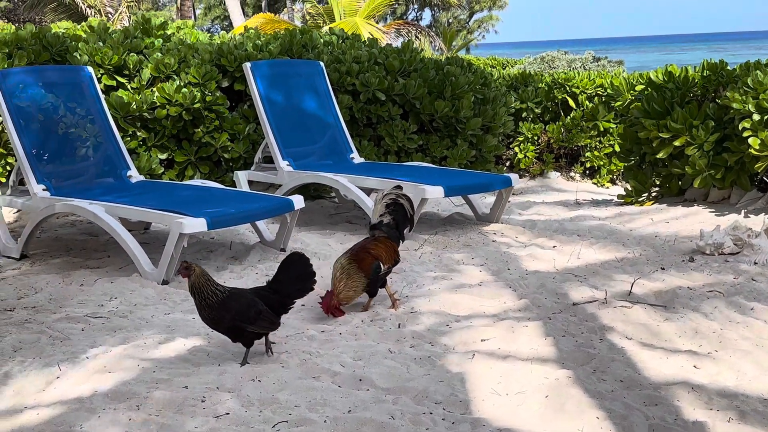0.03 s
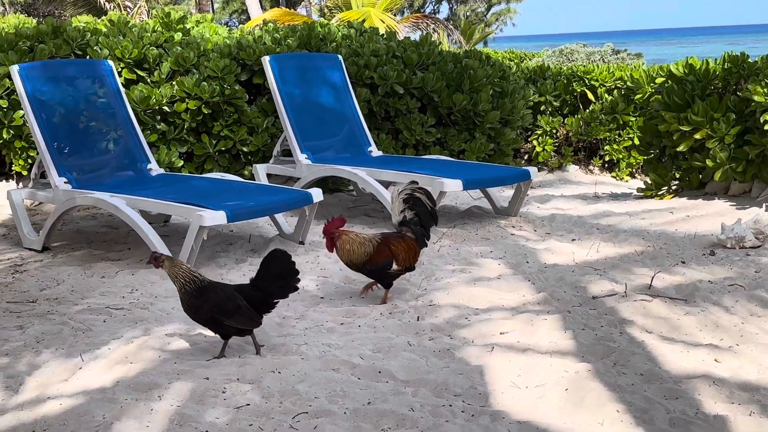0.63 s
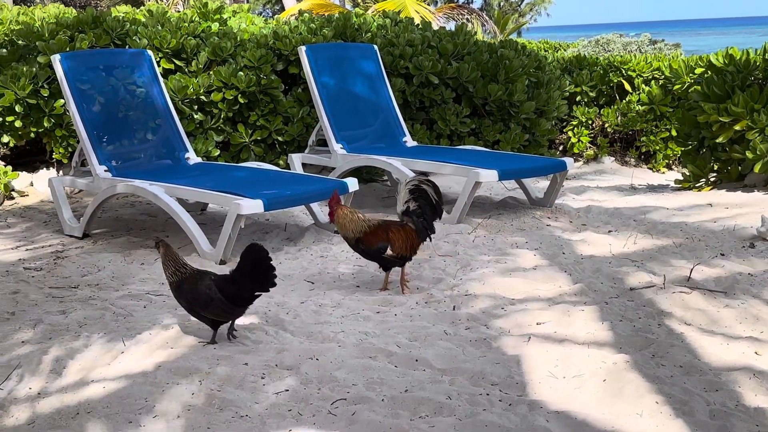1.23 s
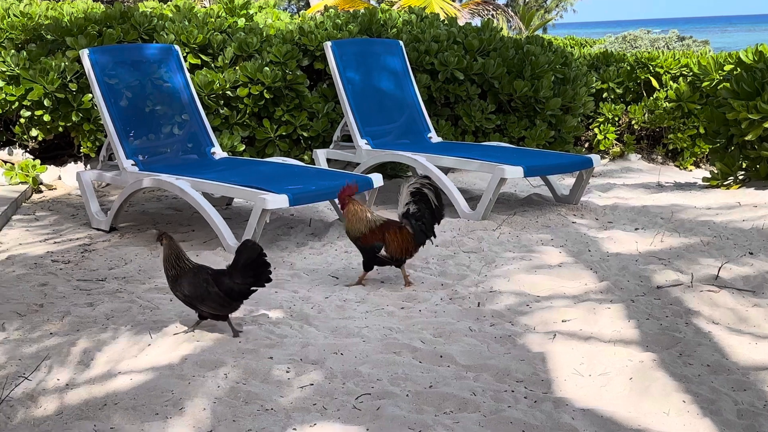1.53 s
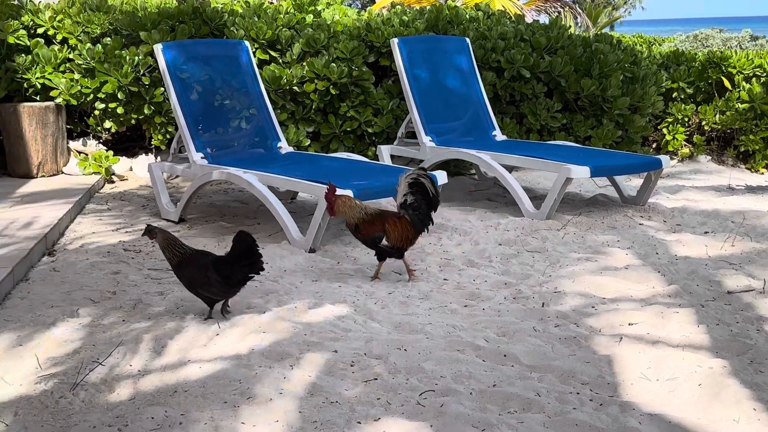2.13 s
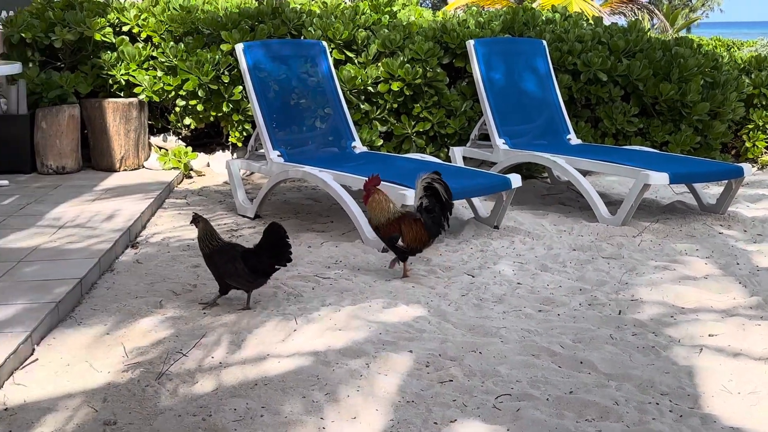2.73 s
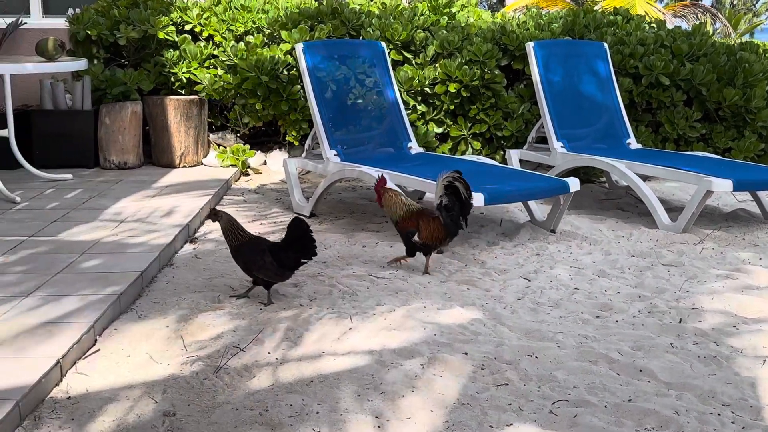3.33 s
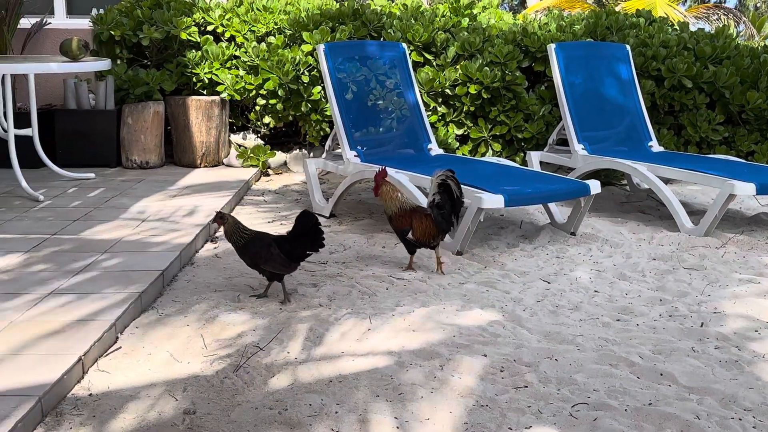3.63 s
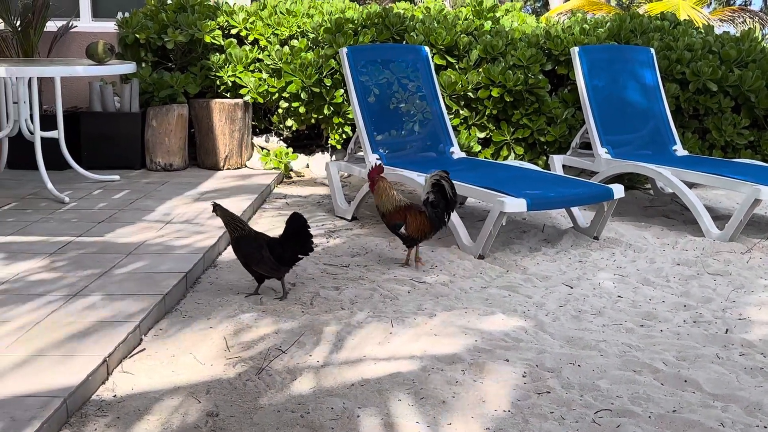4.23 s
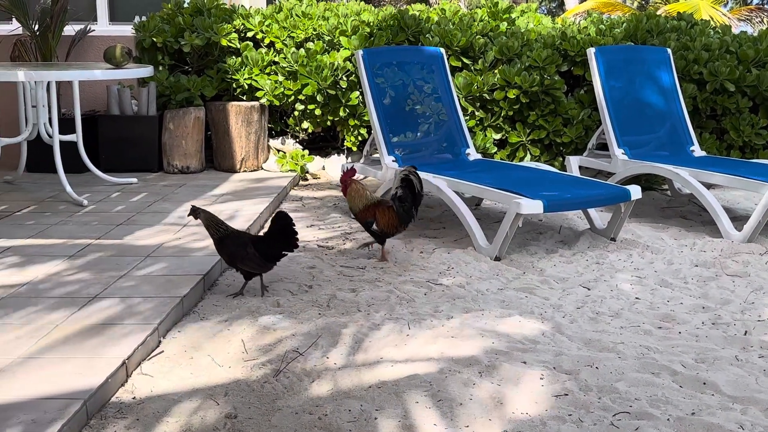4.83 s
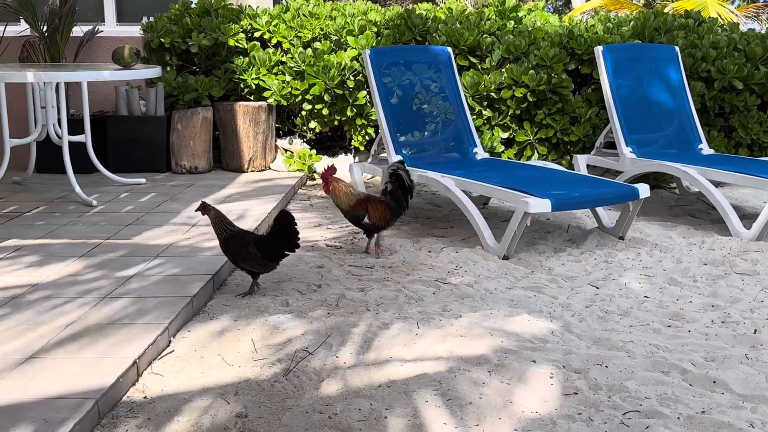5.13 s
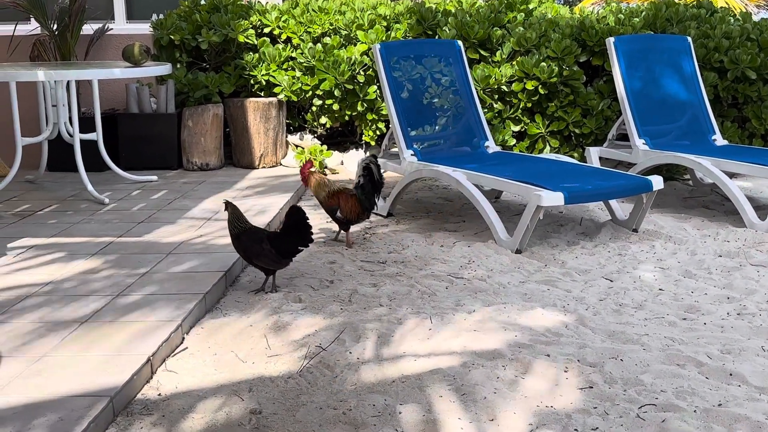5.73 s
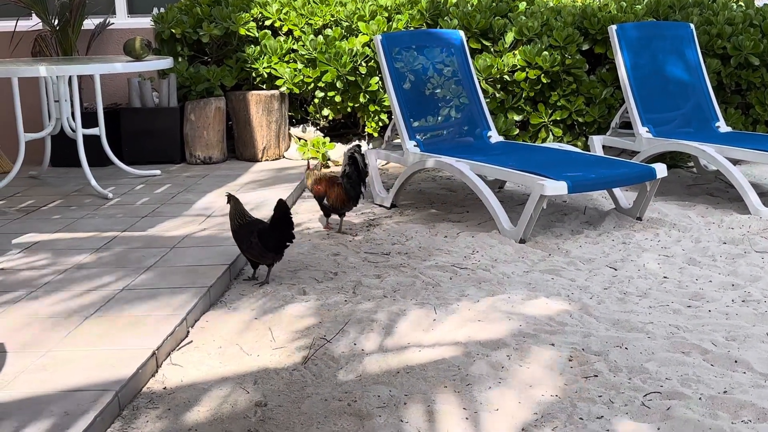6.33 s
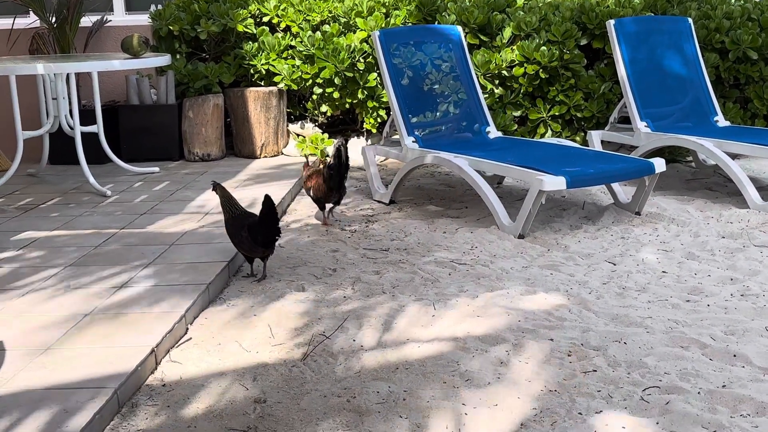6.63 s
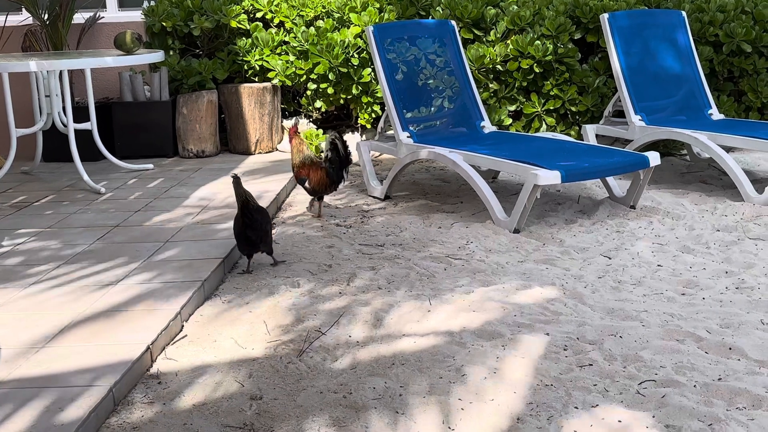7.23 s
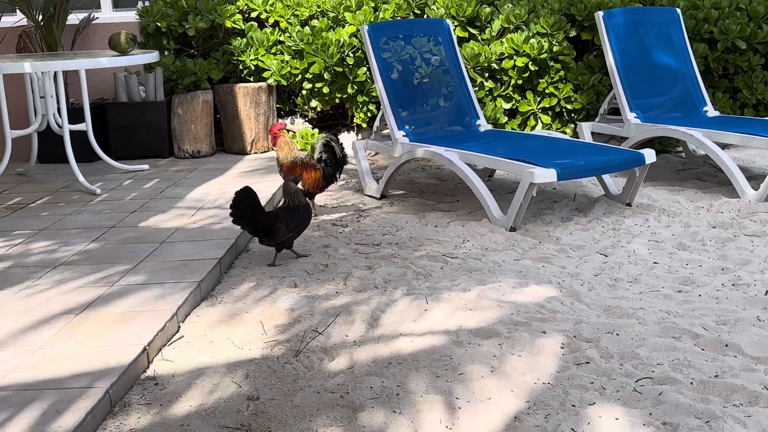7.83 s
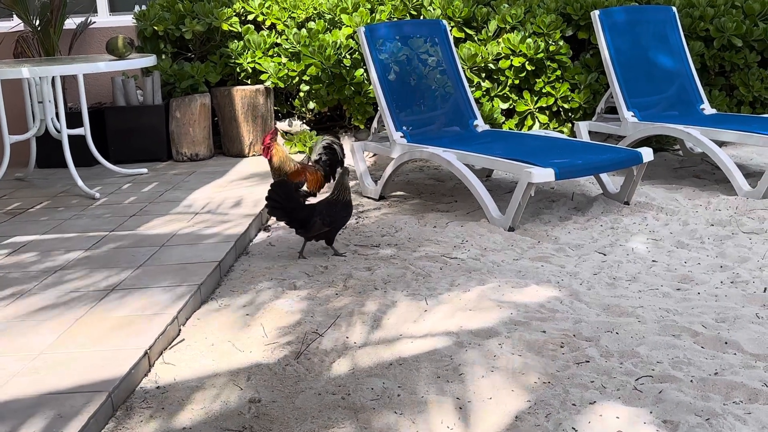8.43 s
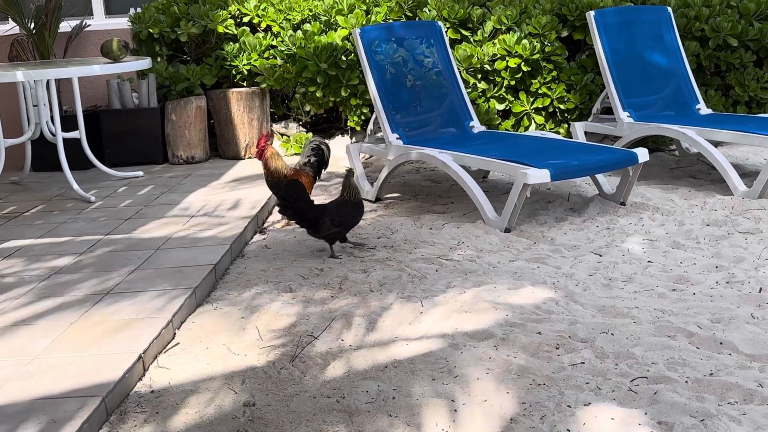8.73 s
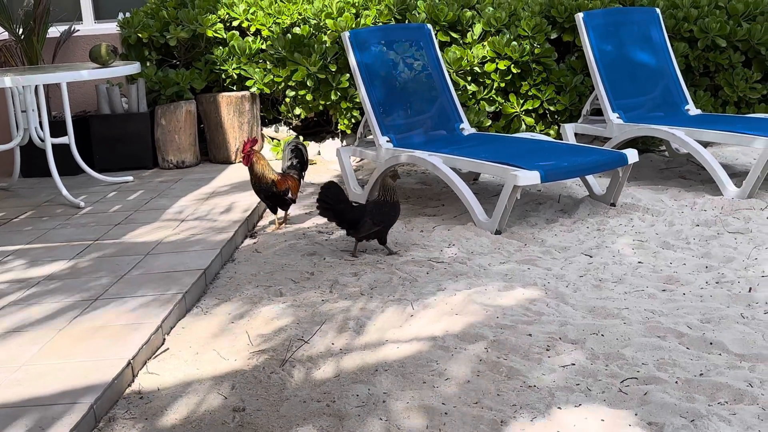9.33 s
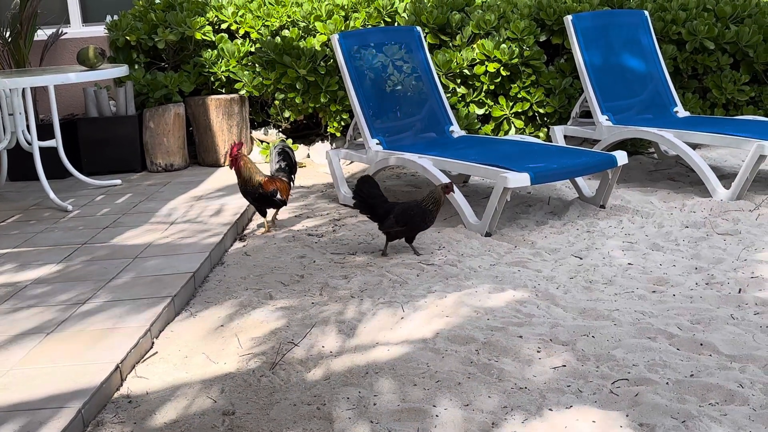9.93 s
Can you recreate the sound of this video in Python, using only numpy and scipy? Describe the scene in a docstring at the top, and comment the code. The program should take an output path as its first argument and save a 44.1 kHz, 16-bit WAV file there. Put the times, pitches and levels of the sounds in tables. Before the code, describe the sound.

Chickens cluck softly over distant surf and rustling leaves, while wind bumps the microphone and an unseen vehicle passes.

```python
"""A quiet beach garden behind a hedge. Far surf, leaves in the breeze, a low rumble, an idling engine
and a machine's hum sound from the start. Chickens cluck softly, among dull taps and scuffs of sand.
Near 4 s a gust buffets the microphone with its eddies; two hollow knocks and a second gust follow.
A vehicle swishes past out of sight, its tread note falling by the Doppler effect at 7 s. Then another
distant engine comes in and revs, and a last weak gust brushes the microphone."""
import sys
import numpy as np
from scipy import signal
from scipy.fft import rfft, irfft
from scipy.io import wavfile
from scipy.ndimage import uniform_filter1d

SR = 44100
rng = np.random.default_rng(int(sys.argv[2]) if len(sys.argv) > 2 else 0)


def file_out(sig):
    """Save sig as 16-bit WAV at sys.argv[1]."""
    # one column per channel
    cols = np.atleast_2d(sig).T
    # limit, then scale
    lim = np.clip(cols, -1, 1)
    pcm = np.round(lim * 32767).astype(np.int16)
    wavfile.write(sys.argv[1], SR, pcm)


N = 440559
TIME = np.arange(N) / SR


def gain_of(db):
    """The decibel law: amplitude grows tenfold every 20 dB."""
    return 10 ** (np.asarray(db) / 20)


def unit_rms(x):
    """Normalisation to unit mean power."""
    return x / np.sqrt(np.mean(x ** 2) + 1e-20)


def at_frequency(rows, hz):
    """Interpolation of a spectrum table on a log-frequency axis."""
    row_hz, value = np.transpose(rows)
    return np.interp(np.log(hz + 1), np.log(row_hz + 1), value)


def at_time(rows, t):
    """Linear interpolation of a table's last column over the times in its first."""
    columns = np.transpose(rows)
    return np.interp(t, columns[0], columns[-1])


def add(mix, start_s, sound):
    """Superposition: a sound joins the mix at start_s."""
    part = mix[..., max(round(start_s * SR), 0):][..., :sound.shape[-1]]
    part += sound[..., :part.shape[-1]]


def drift(hz):
    """Random modulation: noise of rms 1, low-passed at about hz."""
    bin_hz = np.fft.rfftfreq(N, 1 / SR)
    return unit_rms(irfft(rfft(rng.standard_normal(N)) * np.exp(-(bin_hz / hz) ** 2), N))


def bell(t, crest_s, sigma_s):
    """A Gaussian envelope of height 1."""
    return np.exp(-.5 * ((t - crest_s) / sigma_s) ** 2)


def swells(rows, t):
    """Incoherent addition: the amplitude of Gaussian swells whose powers sum."""
    return np.sqrt(sum((gain_of(db) * bell(t, s, sigma_s)) ** 2 for s, db, sigma_s, *_ in rows))


def stft_grid(size):
    """Frame times (as a column) and bin frequencies of a short-time spectrum."""
    hop = size // 4
    return (np.arange(N // hop + 3) * hop / SR)[:, None], np.fft.rfftfreq(size, 1 / SR)


# Likeness of outdoor sound at the microphone's two ports: frequency_hz, coherence
PORT_COHERENCE = [(60, .985), (130, .955), (290, .78), (420, .68), (600, .55), (750, .72), (950, .78),
                  (1150, .66), (1450, .58), (1750, .76), (2050, .94), (3000, .97), (5000, 1)]
# Level of the left port over the right: frequency_hz, level_db
PORT_BALANCE = [(150, 0), (400, 1.7), (850, 1.7), (1200, -2.3), (1600, -1), (2300, 0)]
# Phase lead of the left port: frequency_hz, phase_rad
PORT_LEAD = [(50, .12), (170, .42), (330, .42), (550, 1.1), (830, 1.6), (1000, 1.42), (1350, .75),
             (1700, 0), (2300, 0), (3000, .2), (4000, 0)]
def diffuse_noise(colour_db, patchy_db, size):
    """A diffuse field is only partly coherent at two ports: noise of rms 1 with drifting patches."""
    t, hz = stft_grid(size)
    a, b, c, d, patches = rng.standard_normal((5, len(t), len(hz)))
    patches = unit_rms(uniform_filter1d(uniform_filter1d(patches, size=9, axis=0), size=12, axis=1))
    coherence = at_frequency(PORT_COHERENCE, hz)
    left = a + 1j * b
    right = coherence * left + np.sqrt(1 - coherence ** 2) * (c + 1j * d)
    lean = gain_of(at_frequency(PORT_BALANCE, hz) / 2)
    lag = np.exp(-1j * at_frequency(PORT_LEAD, hz))
    spectra = np.array([left * lean, right * lag / lean]) * gain_of(colour_db + patchy_db * patches)
    _, noise = signal.istft(spectra, nperseg=size, noverlap=size - size // 4, time_axis=1, freq_axis=2)
    return unit_rms(noise[:, :N])


# Spectrum of far surf: frequency_hz, density_db
SURF_SPECTRUM = [(120, -28), (220, -3), (300, -7), (380, -6), (450, -5), (650, -6), (920, -7), (1340, -11),
                 (1650, -19), (4000, -34.5), (5200, -68)]
# Waves washing in: crest_s, level_db, sigma_s
WAVES = [(.6, -56, 0.53), (2.15, -59.5, 0.73), (3.55, -61.5, 0.77), (6.0, -51.5, 0.45), (7.6, -61, 1),
         (9.37, -56, 0.35)]
def surf():
    """Incoherent sources add in power: single waves rise over the steady wash."""
    _, hz = stft_grid(size=1024)
    level = np.hypot(gain_of(-60.5), swells(WAVES, TIME))
    flutter = gain_of(.5 * drift(hz=12))
    return level * flutter * diffuse_noise(at_frequency(SURF_SPECTRUM, hz), patchy_db=1.72, size=1024)


# Spectrum of the hedge's hiss: frequency_hz, density_db
LEAF_SPECTRUM = [(1200, -23), (2000, 5), (4000, 3), (5000, 3), (7800, 4), (9500, -1), (11000, 1.5),
                 (12500, -2.5), (15700, -3)]
# Puffs of breeze: crest_s, level_db, sigma_s
PUFFS = [(.1, -71.5, 0.44), (1.15, -66.5, 0.18), (4.25, -69, 0.25), (5.5, -70, 1), (8.1, -70, 0.2)]
def leaves():
    """Flow noise swells with the breeze; leaves touching at random add ticks of shot noise."""
    _, hz = stft_grid(size=512)
    touches_per_s, tick_decay_s = 90, .002
    level = np.hypot(gain_of(-67), swells(PUFFS, TIME))
    hiss = diffuse_noise(at_frequency(LEAF_SPECTRUM, hz), patchy_db=1.5, size=512)
    touches = (rng.random(N) < touches_per_s / SR) * gain_of(3.5 * np.minimum(rng.exponential(1, N), 4))
    ticks = signal.lfilter([1], [1, -np.exp(-1 / (tick_decay_s * SR))], touches) * rng.standard_normal(N)
    ticks = unit_rms(signal.sosfilt(signal.butter(1, 4000, "high", fs=SR, output="sos"), ticks))
    rustle = hiss + gain_of(-16) * ticks
    return level * gain_of(.41 * drift(hz=16)) * rustle


# Spectrum of wind and far traffic: frequency_hz, density_db
RUMBLE_SPECTRUM = [(18, -50), (30, -34), (42, -2.5), (58, 0.5), (80, -2), (120, -7), (170, -13.5),
                   (240, -19), (400, -28), (800, -59.5)]
# Level of the rumble, dipping after the two main gusts; idle and hum follow it: time_s, level_db
RUMBLE_LEVEL = [(0, -49.5), (.8, -52.5), (1.7, -49.5), (2.8, -52), (3.35, -51), (4.05, -50), (4.25, -59.5),
                (4.6, -65), (5.25, -51), (5.65, -44.5), (6.2, -47.5), (6.65, -56), (7.05, -59),
                (7.4, -51.5), (8.2, -50.5), (9.1, -52.5), (9.99, -45)]
def rumble():
    """Low-frequency noise of wind and far traffic, to which each gust adds its power."""
    _, hz = stft_grid(size=4096)
    level = np.hypot(gain_of(at_time(RUMBLE_LEVEL, TIME)), gain_of(-5) * gust_strength(TIME))
    return level * diffuse_noise(at_frequency(RUMBLE_SPECTRUM, hz), patchy_db=-.04, size=4096)


def drone(hz, level_db, orders, waver_db):
    """A distant machine's harmonic series: only the lowest orders carry, each wavering on the wind."""
    turns = np.cumsum(hz * (1 + .0059 * drift(hz=5.06))) / SR  # the speed wanders slightly
    port_turns = np.array([[.0165], [-.0165]])
    harmonics = np.zeros((2, N))
    for order, db in orders:
        amplitude = gain_of(db + waver_db * drift(hz=4.2))
        harmonics += amplitude * np.sin(2 * np.pi * (order * turns + rng.random() + port_turns))
    return gain_of(level_db) * unit_rms(harmonics)


# Frequency response of the exhaust: frequency_hz, gain_db
EXHAUST = [(38, -4.5), (46, 2), (78, -7), (92, 0), (122, -2), (140, -10), (175, -19.5), (232, -17.5),
           (280, -39)]
def idling_engine():
    """Source and filter: as the idle sags, slows and fades, its orders cross the exhaust's resonances."""
    idle_hz, droop_hz_per_s, settled_s = 47.4, .8, 2.3
    sag_hz = 7.2 * bell(TIME, crest_s=.6, sigma_s=.24)
    hz = idle_hz - sag_hz - droop_hz_per_s * np.minimum(TIME, settled_s)
    away_db = np.clip(3 * (TIME - 1.9), 0, 11)  # moves off from 1.9 s, losing 3 dB a second
    orders = [(order, at_frequency(EXHAUST, order * hz)) for order in range(1, 7)]
    return drone(hz, at_time(RUMBLE_LEVEL, TIME) + 5.5 - away_db, orders, waver_db=2.3)


# Harmonics of the hum: order, level_db
HUM_ORDERS = [(1, 3), (2, -10.5), (5, -22)]
def machine_hum():
    """Periodic vibration at a nearly constant rate gives a low harmonic hum."""
    return drone(hz=60.46, level_db=at_time(RUMBLE_LEVEL, TIME) - 1, orders=HUM_ORDERS, waver_db=6.5)


# Spectrum of tyre roar when centred on 900 Hz: frequency_hz, density_db
ROAR_SPECTRUM = [(250, -27), (330, -26), (460, -5.5), (560, -15), (740, -0.5), (900, 0.5), (1100, -6.5),
                 (1350, -9), (1600, -13.5), (2600, -23.5), (4500, -36), (7000, -57)]
# Swells of tyre roar: crest_s, level_db, sigma_s, centre_hz
PASSES = [(0.44, -62.5, 0.61, 980), (4.166, -62.5, 0.75, 1100), (5.65, -54, 0.37, 864),
          (7.13, -53.5, 1.17, 920), (9.25, -62.5, 0.23, 1210)]
def tyre_roar():
    """Broadband rolling noise, centred on the power-weighted mean frequency of its swells."""
    t, hz = stft_grid(size=2048)
    powers = [swells([row], t) ** 2 + 1e-30 for row in PASSES]
    centre_hz = sum(power * row[-1] for power, row in zip(powers, PASSES)) / sum(powers)
    colour_db = at_frequency(ROAR_SPECTRUM, hz * 900 / centre_hz)
    return swells(PASSES, TIME) * diffuse_noise(colour_db, patchy_db=1.5, size=2048)


# Soft clucks: start_s, peak_db, pitch_hz, length_s
CLUCKS = [(0.232, -39, 211.5, 0.034), (0.377, -38.5, 228.5, 0.028), (0.58, -49, 186, 0.016),
          (0.738, -34.5, 221.5, 0.037), (2.395, -48, 238, 0.023)]
# Formants of a chicken's throat: frequency_hz, bandwidth_hz, level_db
THROAT = [(374, 350, 12), (684, 110, -7), (1130, 160, 1.5), (1310, 120, 0), (1600, 270, -19),
          (3300, 1400, -25)]
def clucks():
    """Source and filter: a handful of voice pulses ring the formants of a chicken's throat."""
    out = np.zeros(N)
    t = np.arange(SR // 50) / SR
    ring = sum(gain_of(db) * width * np.exp(-np.pi * width * t) * np.sin(2 * np.pi * hz * t)
               for hz, width, db in THROAT)
    for start_s, db, hz, length_s in CLUCKS:
        count = round(length_s * SR)
        pulses = np.diff(np.floor(np.arange(count + 1) * hz / SR))  # one per pitch period
        call = np.convolve(pulses * signal.windows.tukey(count, .8), ring)
        add(out, start_s, gain_of(db) * call / abs(call).max())
    return out


# Dull taps: start_s, peak_db, band_hz, t60_s
TAPS = [(0.382, -47, 248, 0.057), (0.580, -42, 367, 0.09), (1.945, -45, 480, .1), (2.287, -47, 320, .1),
        (2.802, -52, 409, 0.05), (3.109, -42.5, 380, 0.09), (3.238, -48, 300, 0.059),
        (3.544, -44, 670, 0.048), (5.071, -48.5, 380, 0.035)]
def taps():
    """Heavily damped transients: puffs of low band noise that decay exponentially."""
    out = np.zeros((2, N))
    t = np.arange(SR // 4) / SR
    for start_s, db, hz, t60 in TAPS:
        onset = 1 - np.exp(-t / (.019 * t60))  # longer taps start more softly
        shared, apart = rng.standard_normal((2, len(t))) * onset * gain_of(-60 * t / t60)
        band = signal.butter(3, [hz / 1.7, hz * 1.4], "band", fs=SR, output="sos")
        tap = signal.sosfilt(band, [shared + .67 * apart, shared - .56 * apart])
        add(out, start_s, gain_of(db) * tap / abs(tap).max())
    return out


# Feet scuffing sand, in a narrow band just under top_hz: start_s, level_db, top_hz, length_s
SCUFFS = [(1.084, -78, 4800, .2), (1.215, -65, 4300, .05), (9.138, -71.5, 3100, 0.23)]
def scuffs():
    """Granular friction: sand slips under a foot in a brief, gritty swish."""
    out = np.zeros(N)
    for start_s, db, hz, length_s in SCUFFS:
        grains = rng.standard_normal(round(length_s * SR)) ** 3  # cubing makes the noise spiky
        band = signal.butter(2, [hz / 1.09, hz * .96], "band", fs=SR, output="sos")
        grit = unit_rms(signal.sosfilt(band, grains))
        add(out, start_s, gain_of(db) * grit * signal.windows.hann(len(grit)))
    return out


# Distinct eddies at the microphone: crest_s, peak_db, pitch_hz (at the crest)
EDDIES = [(1.564, -37.5, 385), (2.144, -43, 332), (3.700, -22, 185), (3.736, -22, 173), (3.747, -15, 126),
          (3.767, -21, 72), (3.819, -35, 224), (3.830, -21, 129), (3.846, -22.5, 123), (3.899, -19, 70),
          (3.917, -22.5, 175), (3.928, -23, 94.5), (3.951, -34.5, 233), (3.965, -25.5, 85),
          (3.984, -25, 212), (4.012, -14, 97), (4.034, -20.5, 52), (4.046, -28.5, 178),
          (4.066, -23.5, 70.5), (4.080, -25.5, 113), (4.105, -27, 96), (5.545, -37, 70), (5.985, -25, 102),
          (6.017, -25, 155), (6.034, -26, 125), (6.139, -21.5, 242), (6.154, -24.5, 238),
          (6.164, -26.5, 143), (6.182, -30, 90), (9.501, -39.5, 270), (9.515, -39, 268), (9.82, -33, 72.2),
          (9.892, -35.5, 84)]
def buffets():
    """Turbulent pressure: each eddy shoves the diaphragm in a few uneven swings that sink to a thump."""
    rise_cycles, fall_per_rise, sharpness, thump_hz = 1.47, .55, 4.55, 48
    out = np.zeros((2, N))
    t = np.arange(SR // 8) / SR
    turbulence = drift(hz=136)
    eddies = EDDIES + small_eddies()
    for (crest_s, db, hz), (phase, side) in zip(eddies, rng.random((len(eddies), 2))):
        rise_s = rise_cycles / hz
        age = t / rise_s  # 1 at the crest
        stray = np.exp(.12 * np.roll(turbulence, -round(crest_s * SR))[:len(t)])
        sinking_hz = np.maximum(hz * np.exp(fall_per_rise * (1 - age)), thump_hz)
        turns = np.cumsum(stray * sinking_hz) / SR
        swell = gain_of(db) * (age * np.exp(1 - age)) ** sharpness
        port_turns = np.array([[.035], [-.035]]) * np.sign(side - .5)  # one port is met first
        add(out, crest_s - rise_s, swell * np.sin(2 * np.pi * (turns + phase + port_turns)))
    return out


# Gusts, each a stream of small eddies: start_s, length_s, eddy_peak_db, typical_pitch_hz
GUSTS = [(3.714, 0.39, -33.5, 125), (5.971, 0.21, -35, 165), (6.251, 0.084, -38.5, 178),
         (6.485, 0.0427, -41, 131), (9.43, 0.35, -49, 131)]
def gust_strength(t, edge_s=.03):
    """A trapezoidal envelope: each gust rises quickly, holds and drops."""
    return sum(gain_of(db) * np.clip(np.minimum(t - start_s, start_s + length_s - t) / edge_s + 1, 0, 1)
               for start_s, length_s, db, _ in GUSTS)


def small_eddies(spacing_s=.024):
    """Turbulence breaks a gust into eddies of random size and timing: crest_s, peak_db, pitch_hz."""
    slots = np.arange(0, N / SR, spacing_s)
    late, spread = rng.random((len(slots), 2)).T
    times = slots + spacing_s * late
    pitches = at_time(GUSTS, times) * 2 ** (spread - .5)  # scattered over one octave
    pushes = gust_strength(times)
    return [(s, 20 * np.log10(push), hz) for s, push, hz in zip(times, pushes, pitches) if push > 0]


# Hollow knocks some way off: start_s, peak_db
KNOCKS = [(5.513, -33), (5.680, -37)]
# Modes of the hollow body: frequency_hz, level_db, t60_s
HOLLOW_MODES = [(447, -7, 0.047), (600, -7, 0.025), (710, -3, 0.035), (770, 0, 0.027), (980, -10, 0.018)]
def knocks():
    """Modal ringing: a blunt, scraping blow excites short modes, each with its own phase at each port."""
    out = np.zeros((2, N))
    t = np.arange(SR // 4) / SR
    for start_s, db in KNOCKS:
        modes = sum(gain_of(mode_db - 60 * t / t60) * np.sin(2 * np.pi * (hz * t + rng.random((2, 1))))
                    for hz, mode_db, t60 in HOLLOW_MODES)
        scrape = rng.standard_normal(len(t)) * np.exp(-t / .035)
        blow = signal.sosfilt(signal.butter(2, 1600, fs=SR, output="sos"), scrape)
        knock = signal.fftconvolve(modes, blow[None], axes=1)[:, :len(t)]
        add(out, start_s, gain_of(db) * knock / abs(knock).max())
    return out


# Bursts in which the tread sings: crest_s, level_db, sigma_s
TREAD_BURSTS = [(5.85, -55.5, 0.13), (6.33, -51.5, 0.071), (6.87, -50.5, 0.22), (7.3, -57, 0.27),
                (8.4, -61, 0.32)]
def tread_song():
    """Doppler effect: the tread's noisy note and its lower octave fall as the vehicle goes by."""
    tread_hz, half_width_hz = 914, 55
    doppler_share, nearest_s, passing_s = .042, 7, .17
    t, hz = stft_grid(size=2048)
    heard_hz = tread_hz * (1 - doppler_share * np.tanh((t - nearest_s) / passing_s))
    upper, lower = (1 / (1 + ((hz - note) / half_width_hz) ** 2) for note in (heard_hz, heard_hz / 2))
    colour_db = 20 * np.log10(upper + gain_of(-10.5) * lower)
    return swells(TREAD_BURSTS, TIME) * diffuse_noise(colour_db, patchy_db=1.0, size=2048)


# Harmonics of the second engine's firing rate: order, level_db
REVVING_ORDERS = [(1, 6), (2, -13), (3, -16.5), (4, -25)]
def revving_engine():
    """Pitch follows firing rate: the throttle raises pitch and level together, then the engine slows."""
    running_s, base_hz, base_db = 7.25, 57.7, -49.5
    rev_s, rev_hz, rev_db, slowing_hz_per_s = 8.79, 18.4, 6, 5
    throttle = .5 + .5 * np.tanh((TIME - rev_s) / .122)
    hz = base_hz + rev_hz * throttle - slowing_hz_per_s * np.maximum(TIME - rev_s, 0)
    fade_in = np.clip((TIME - running_s) * 10 + 1, 0, 1)
    return fade_in * drone(hz, base_db + rev_db * throttle, REVVING_ORDERS, waver_db=1.5)


def scene():
    """Linear superposition: the pressures of all the sources add at the two ports."""
    background = surf() + leaves() + rumble() + idling_engine() + machine_hum() + tyre_roar()
    return background + clucks() + taps() + scuffs() + buffets() + knocks() + tread_song() + revving_engine()


# Phase lag of the right channel, opposing the left near 8 kHz: frequency_hz, phase_rad
TREBLE_LAG = [(6750, 0), (7000, .8), (7450, 1.5), (7800, 3.1), (8720, 3.2), (9000, 4.7), (9600, 5.3),
              (10300, 5.5), (10450, 6.28), (13000, 6.28), (14000, 7.3), (15700, 8.5)]
def record(dry):
    """Linear filtering: the microphone pair twists the treble's phase and limits the band at both ends."""
    hz = np.fft.rfftfreq(N, 1 / SR)
    lag_rad = np.interp(hz, *np.transpose(TREBLE_LAG))
    right = irfft(rfft(dry[1]) * np.exp(-1j * lag_rad), N)
    pair = signal.sosfilt(signal.butter(3, 34, "high", fs=SR, output="sos"), [dry[0], right])
    low_pass = signal.firwin(1023, cutoff=15720, window=("kaiser", 9), fs=SR)
    return signal.oaconvolve(pair, low_pass[None], "same")


dry = scene()
out = record(dry)
file_out(out)
```